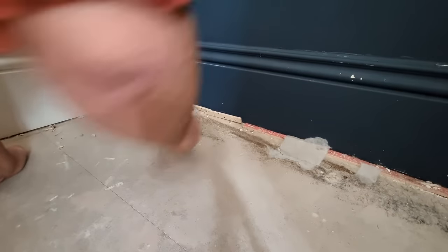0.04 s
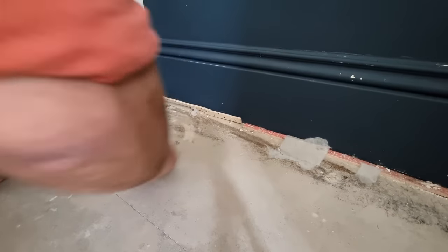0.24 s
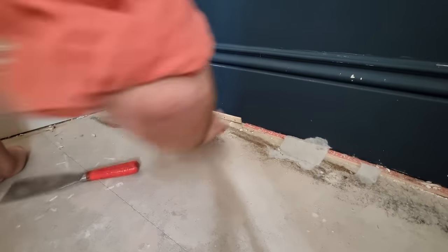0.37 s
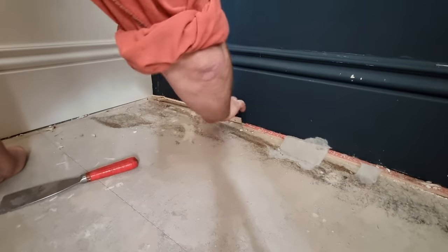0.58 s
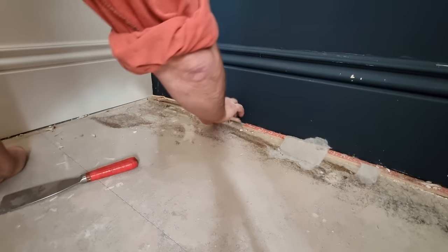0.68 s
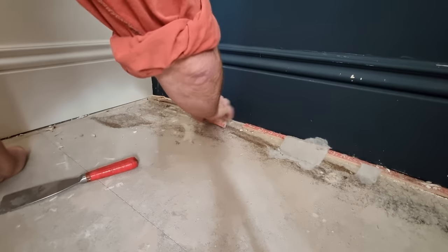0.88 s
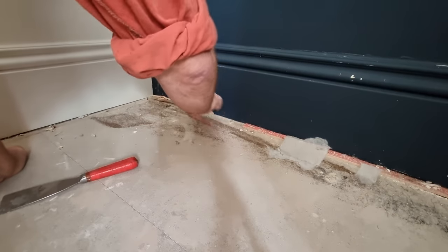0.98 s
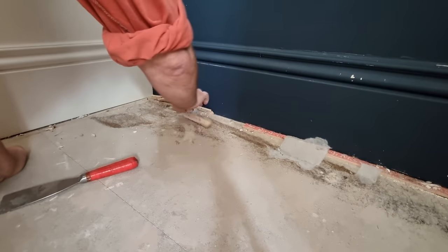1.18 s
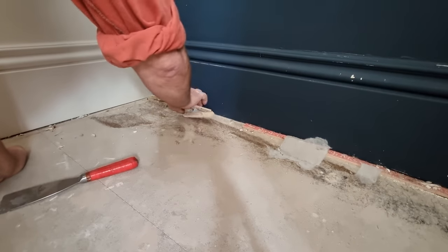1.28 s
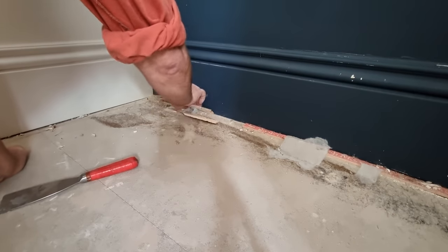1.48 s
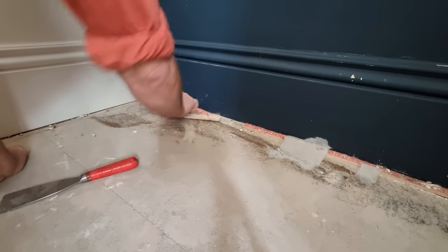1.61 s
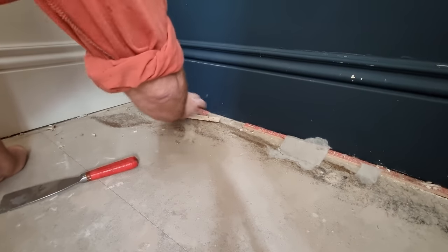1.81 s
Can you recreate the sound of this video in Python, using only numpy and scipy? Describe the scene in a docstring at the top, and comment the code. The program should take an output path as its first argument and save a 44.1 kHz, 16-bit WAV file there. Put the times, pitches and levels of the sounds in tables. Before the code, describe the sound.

Metal chisel dropped on a boarded floor, ringing and bouncing, followed by wood prising cracks

```python
"""A steel chisel lands on hollow floorboards, bounces and rings: clicks, clatter and dying modes of blade and handle.
Fingers then prise up a wooden strip, which cracks and snaps (modes and noise bursts) and scrapes (random grains).
The boards boom and knock as modes struck by a smooth push, and creak low under body weight (shaped noise).
A small bare room adds noise tails and a soft hush; a phone lies near,
its right port shaded and out of step with the left."""
import sys
import numpy as np
from scipy import signal
from scipy.fft import rfft, irfft, next_fast_len
from scipy.io import wavfile

SR = 44100
rng = np.random.default_rng(int(sys.argv[2]) if len(sys.argv) > 2 else 0)


def undo_db(level):
    """Turn decibels back into plain size, where 20 dB means ten times bigger."""
    steps = np.asarray(level, float) / 20
    return 10 ** steps


def to_wav(sig):
    """Store sig (one row per channel, or 1-D mono) as 16-bit WAV at the path in sys.argv[1].

    Samples outside -1..1 are clipped; the rate is SR.
    """
    pcm = np.clip(np.atleast_2d(sig), -1, 1) * 32767
    pcm = np.round(pcm).astype(np.int16)
    wavfile.write(sys.argv[1], SR, pcm.T)  # frames by channels


N = 81585  # samples in the scene


def unit(x):
    """Scales a sound to rms 1."""
    return x / np.sqrt(np.mean(x ** 2) + 1e-20)


def along(points, hz):
    """Reads (frequency, value) points on a log frequency axis."""
    f, value = np.transpose(points)
    return np.interp(np.log(hz + 1), np.log(f + 1), value)


def curve(rows):
    """Joins (time, value) points with straight lines, one value per sample."""
    return np.interp(np.arange(N) / SR, *np.transpose(rows))


def filtered(x, response):
    """Multiplies the spectrum of x by a complex response of frequency."""
    m = next_fast_len(x.shape[-1] + SR // 2)
    spectrum = rfft(x, m) * response(np.fft.rfftfreq(m, 1 / SR))
    return irfft(spectrum, m)[..., :x.shape[-1]]


def coloured(x, spectrum):
    """Shapes x by a spectrum in dB and scales it to rms 1."""
    return unit(filtered(x, lambda hz: undo_db(along(spectrum, hz))))


def add(track, s, sound):
    """Mixes a sound in at s seconds; one that began before the start enters part-way through."""
    i = round(s * SR)
    part = track[max(i, 0):max(i + len(sound), 0)]
    part += sound[max(-i, 0):][:len(part)]


FLUTTER_PER_S = 65  # new random levels per second in a wavering mode


def ring(modes, spread_db, length_s, tilt_db=0, flutter_db=0):
    """Struck body: dying sine modes, each with a new level at every blow and its own wavering."""
    t = np.arange(int(length_s * SR)) / SR
    hz, db, t60 = np.transpose(modes)[:, :, None]
    knots = rng.standard_normal((len(modes), 64))
    waver = np.array([np.interp(t * FLUTTER_PER_S, np.arange(64), k) for k in knots])
    level = db + tilt_db * np.log2(hz / hz[0])  # tilt per octave above the first mode
    level = level + spread_db * rng.standard_normal(hz.shape) + flutter_db * waver
    return np.sum(undo_db(level - 60 * t / t60) * np.sin(2 * np.pi * hz * t), axis=0)


RISE_S = 0.0011  # time constant of a burst's onset


def burst(hz, width, t60):
    """Dying noise through a broad resonance, applied twice for steep skirts; peak 1."""
    t = np.arange(SR // 8) / SR
    noise = rng.standard_normal(len(t)) * undo_db(-60 * t / t60) * (1 - np.exp(-t / RISE_S))

    def resonance(f):
        damping = 1j * f * width * hz  # width is a fraction of the pitch
        return (damping / (hz * hz - f * f + damping)) ** 2

    out = filtered(noise, resonance)
    return out / np.abs(out).max()


# chisel contacts; hardness tilts the blade's modes and moves the click's pitch:
# (time [s], click level [dB], blade ring level [dB], handle knock level [dB], hardness [dB per octave])
CONTACTS = [(-.1, -90, -45.5, -35.5, 11), (.2040, -16.5, -29, -35.5, -1), (.2384, -15, -34, -32, 0),
            (.2500, -25, -30, -55, -0.5), (.2790, -6, -34, -27.5, -3.5), (.2970, -40, -30.5, -28.5, -10),
            (.3346, -26, -42, -28, 9), (.3568, -22.5, -35.5, -35, -3.5), (.3972, -25, -70, -34, 3),
            (.4175, -19.5, -26, -31, 2), (.4368, -23, -53, -36.5, 5), (.5520, -32.5, -76, -50.5, -8)]
# ringing modes of the steel blade: (frequency [Hz], level [dB], t60 [s])
BLADE_MODES = [(3270, -14, .35), (3323, -7, .3), (3390, -16, .12), (4850, -20, .2), (4884, -9, .42),
               (5943, -28, .2), (6714, -12, .4), (6770, -22, .2), (8850, -17, .27), (9300, -24, .15),
               (10870, -23, .14), (11310, -18, .2), (13440, -18, .16), (14250, -21, .12)]
# duller modes of the handle: (frequency [Hz], level [dB], t60 [s])
HANDLE_MODES = [(496, -7.5, 0.087), (555, -7.5, 0.15), (658, -5, 0.072), (695, -11, 0.26),
                (707.5, 0.5, .14), (780, -16.5, .1)]
MUTE_DB = -10  # change of blade ring at each later contact but the last
FLUTTER_DB = 4.5  # the ring wavers as the blade rocks
CLICK_HZ, HARD_DB_PER_OCTAVE = 2040, 3.5  # click pitch at zero hardness; hardness that lifts it an octave
CLATTER_DB = 5  # over the handle knock level


def chisel():
    """Every contact clicks, clatters, knocks the handle and rings the blade; later contacts mute that ring."""
    out = np.zeros(N)
    for k, (s, click_db, ring_db, knock_db, hard_db) in enumerate(CONTACTS):
        steel = ring(BLADE_MODES, spread_db=4.0, length_s=.45, tilt_db=hard_db, flutter_db=FLUTTER_DB)
        now = np.arange(len(steel)) / SR + s
        # count of muting contacts so far, each taking hold over 2 ms
        mutes = sum(np.clip((now - row[0]) / .002, 0, 1) for row in CONTACTS[k + 1:-1])
        add(out, s, undo_db(ring_db + MUTE_DB * mutes) * steel)
        handle = ring(HANDLE_MODES, spread_db=5, length_s=.3, flutter_db=FLUTTER_DB)
        add(out, s, undo_db(knock_db) * handle)
        add(out, s, undo_db(knock_db + CLATTER_DB) * burst(1000, width=1.24, t60=0.047))
        click_hz = CLICK_HZ * 2 ** (hard_db / HARD_DB_PER_OCTAVE)
        add(out, s, undo_db(click_db) * burst(click_hz, width=1.24, t60=0.022))
    return out


# cracks of the strip: (time [s], level [dB], pitch [Hz], treble snap level [dB], noise t60 [s])
CRACK_EVENTS = [(0.714, -44, 2920, -60, 0.15), (0.732, -36.5, 3570, -61, 0.1),
                (.7460, -33.5, 1442, -68, 0.027), (0.7993, -55.5, 2560, -38, 0.037),
                (0.816, -49.5, 1800, -49.5, 0.12), (0.9921, -36.5, 1000, -92, 0.026),
                (1, -33.5, 1110, -74.5, 0.028), (1.102, -29, 785, -46, 0.026),
                (1.1872, -30.5, 1160, -55.5, 0.015), (1.209, -44.5, 1500, -80, 0.009),
                (1.334, -21.5, 1880, -54, 0.015), (1.3682, -29, 2000, -54, 0.014),
                (1.472, -49, 3500, -67, 0.015), (1.4891, -38, 1500, -42.5, .04),
                (1.4979, -30, 3700, -26.5, 0.035), (1.5507, -36, 2870, -38.5, 0.027),
                (1.5610, -29, 1020, -69, 0.047), (1.576, -34, 1730, -44.5, 0.039),
                (1.6241, -32, 1020, -48, 0.038), (1.7192, -23, 1880, -78, 0.019),
                (1.746, -33.5, 1700, -73, 0.0135), (1.8280, -69, 720, -56, 0.021)]
# modes of the wooden strip: (frequency [Hz], level [dB], t60 [s])
STRIP_MODES = [(363, -2, 0.17), (762, 0, 0.054), (1170, -2.5, 0.049), (1386, -4, 0.032),
               (1800, -5.5, 0.022), (2335, 2, 0.016), (2960, -9.5, 0.015), (3700, -18, 0.0087),
               (5260, -22, 0.0083)]
# colour of the treble snap: (frequency [Hz], density [dB per Hz])
SNAP_COLOUR = [(2500, -31), (3700, 3.5), (5000, 3), (7000, 1.5), (9000, -0.5), (12000, 2), (16300, 2.5)]
# loudness of the rubbing: (time [s], level [dB])
SCRAPE_LEVEL = [(0, -69.5), (.55, -82), (.66, -52), (.70, -68), (.72, -55), (.76, -48), (.8, -70),
                (.85, -81), (.89, -80.5), (1.2, -52), (1.3, -67), (1.33, -44.5), (1.46, -73), (1.5, -42.5),
                (1.58, -58), (1.61, -80), (1.68, -67.5), (1.85, -67)]
# colour of the rubbing: (frequency [Hz], density [dB per Hz])
GRIT_COLOUR = [(250, -9), (400, 10), (900, 2.5), (1500, -6.5), (2200, -11.5), (3200, -5.5), (4500, -14),
               (7500, -24), (9000, -28.5), (16000, -19.5)]
STRIP_DB, OFF_PITCH_DB = -7.5, -5.5  # mode ring within a crack; change per octave away from the crack's pitch
SPLINTER_DB = -12  # broad ring of the thin wood, relative to the crack
GRAINS_PER_S, GRAIN_SPREAD_DB = 3100, 1.5


def strip():
    """Cracks ring the modes near their pitch, with woody noise and a short treble snap, over gritty rubbing."""
    out, t = np.zeros(N), np.arange(SR // 16) / SR
    for s, db, hz, snap_db, t60 in CRACK_EVENTS:
        near = [(f, level + OFF_PITCH_DB * abs(np.log2(f / hz)), life) for f, level, life in STRIP_MODES]
        add(out, s, undo_db(db + STRIP_DB) * ring(near, spread_db=5.5, length_s=.12))
        crack = burst(hz, width=0.67, t60=t60)
        splinter = burst(1500, width=1.05, t60=t60)
        add(out, s, undo_db(db) * (crack + undo_db(SPLINTER_DB) * splinter))
        snap = coloured(rng.standard_normal(len(t)), SNAP_COLOUR)
        add(out, s, undo_db(snap_db - 60 * t / 0.047) * snap)  # t60 0.047 s
    chance = rng.random((N, 2))
    caught = chance[:, 0] < GRAINS_PER_S / SR
    size = undo_db(-GRAIN_SPREAD_DB * np.log(chance[:, 1] + 1e-4))  # a few grains stand out
    grains = caught * size * rng.standard_normal(N)
    return out + undo_db(curve(SCRAPE_LEVEL)) * coloured(grains, GRIT_COLOUR)


# loads on the boards, before push and bass cut shape them: (time [s], boom level [dB], knock level [dB])
LOADS = [(0.207, -22, -27), (0.283, -12, -20), (.359, -12.5, -20.5), (0.399, -20.5, -41),
         (.44, -17.5, -32.5), (0.499, -42, -39), (0.554, -65, -37.5), (0.577, -40, -36.5),
         (.622, -54, -36.5), (.645, -50, -39.5), (.67, -73, -48.5), (0.718, -36.5, -54),
         (0.767, -39.5, -49), (0.798, -54.5, -48), (0.942, -51, -74), (1.001, -46, -41),
         (1.104, -54.5, -33), (1.188, -56, -42), (1.234, -41, -43.5), (1.334, -47.5, -47),
         (1.49, -29, -36.5), (1.502, -25, -42), (1.558, -26, -34), (1.618, -33.5, -64), (1.722, -68, -66.5),
         (1.83, -39.5, -52)]
# boom of the hollow floor: (frequency [Hz], level [dB], t60 [s])
BOOM_MODES = [(67, -9, .15), (82.1, -4.5, 0.25), (90.4, -9, 0.13), (112.2, -11.5, 0.15), (145.5, -9, 0.058)]
# knock of the nearest plank: (frequency [Hz], level [dB], t60 [s])
PLANK_MODES = [(168, -12.5, 0.21), (225.8, -13, 0.19), (268.9, 2.5, 0.094), (337.8, -5.5, 0.17),
               (361, -7.5, 0.077)]
CONTACT_S = 0.0029  # length of the push
BASS_CUT_HZ = 67  # the microphone's bass cut, applied here to booms and knocks: little is heard below this


def boards():
    """A smooth push booms in the hollow floor and knocks the nearest plank, heard through a bass cut."""
    out, push = np.zeros(N), np.hanning(int(CONTACT_S * SR))
    for s, boom_db, knock_db in LOADS:
        boom = ring(BOOM_MODES, spread_db=4, length_s=.35)
        knock = ring(PLANK_MODES, spread_db=1.0, length_s=.35)
        add(out, s, undo_db(boom_db) * boom + undo_db(knock_db) * knock)
    out = signal.fftconvolve(out, push / push.sum())[:N]
    return filtered(out, lambda f: ((1j * f) ** 2 / (BASS_CUT_HZ ** 2 - f * f + 1.4j * f * BASS_CUT_HZ)) ** 2)


# swell of the creak: (time [s], level [dB])
WEIGHT_LEVEL = [(0.0, -64), (0.148, -73), (0.39, -47), (0.51, -77), (0.674, -73), (0.896, -64.5),
                (1.06, -69), (1.236, -51.5), (1.37, -53.5), (1.452, -49.5), (1.642, -60), (1.85, -63)]
# colour of the creak: (frequency [Hz], density [dB per Hz])
CREAK_COLOUR = [(20, -48), (30, -17), (40, 16), (55, 1), (130, 1), (300, -43.5)]


def body_weight():
    """Slow creak of body weight on the joists: low noise that swells and fades."""
    return undo_db(curve(WEIGHT_LEVEL)) * coloured(rng.standard_normal(N), CREAK_COLOUR)


# decay of the small bare room: (frequency [Hz], t60 [s])
ROOM_DECAY = [(100, 0.38), (500, 0.42), (2000, 0.26), (6000, 0.28), (14000, .15)]


def room(x):
    """Two noise tails, each frequency dying at its own speed; fresh tails for each fifth of a second."""
    out, step = np.zeros((2, N + SR)), SR // 5
    for i in range(0, N, step):
        hz, t, z = signal.stft(rng.standard_normal((2, SR // 2)), SR, nperseg=256)
        decay = undo_db(-60 * t / along(ROOM_DECAY, hz)[:, None])
        tail = signal.istft(z * decay, SR, nperseg=256)[1]
        wet = signal.fftconvolve(x[None, i:i + step], tail / np.linalg.norm(tail[0]), axes=1)
        out[:, i + SR // 200:][:, :wet.shape[1]] += wet  # 5 ms after the direct sound
    return out[:, :N]


# colour of the room and microphone hush: (frequency [Hz], density [dB per Hz])
HUSH_COLOUR = [(30, -23), (70, 12), (200, 13.5), (500, -14.5), (1000, -7.5), (3000, -8), (7000, -10.5),
               (9000, -12.5), (16300, -45.5)]


def hush():
    """Steady room and microphone hush, two independent shaped noises: one heard at both ports, one at the right."""
    return coloured(rng.standard_normal((2, N)), HUSH_COLOUR)


# extra room sound and hush that only the right port hears: (frequency [Hz], level [dB])
STRAY_LEVEL = [(60, -14), (150, -6), (500, 2), (1300, -1), (3000, 3), (8000, 4)]
ROOM_DB, HUSH_DB = -9, -66  # levels in the mix before the port gains
CORNER_DB = -4  # the right port faces away from the corner where the strip lies; its room and hush drop too
PAIR_DB = 5.5  # gain of both ports


def scene():
    """What arrives at the left and at the right port, before the phone's body shades the right one."""
    tool = chisel() + (boards() + body_weight())
    corner = strip()
    around = undo_db(ROOM_DB) * room(tool + corner) + undo_db(HUSH_DB) * hush()
    stray = filtered(around[1], lambda hz: undo_db(along(STRAY_LEVEL, hz)))
    left = tool + corner + around[0]
    right = tool + undo_db(CORNER_DB) * (corner + around[0] + stray)
    return undo_db(PAIR_DB) * np.array([left, right])


def band_limit(x):
    """A steep low-pass at the top of the band."""
    return signal.sosfilt(signal.butter(12, 16490, fs=SR, output="sos"), x)


# loss at the shaded right port: (frequency [Hz], loss [dB])
SHADE_LOSS = [(60, 14.5), (110, 14.5), (200, 14), (380, 7), (700, 5), (1290, 8), (2380, 11.5), (4400, 15.5),
              (8120, 18), (15000, 21)]
# phase by which the left port leads the right; below zero it trails: (frequency [Hz], phase [radians])
LEFT_LEAD = [(60, 0), (150, -.4), (260, -2.3), (860, -2.6), (2500, -2), (7700, -1.8), (16000, -1.5)]
# response of both microphones: (frequency [Hz], level [dB])
MIC_RESPONSE = [(3200, -1), (4000, -6), (5000, -2), (6200, -3), (7400, 0.5), (8200, -9), (10000, -10),
                (16000, -12)]
TOP_HZ = 16450  # nothing passes from here up
CEILING, KNEE = .58, 5  # full-scale limit of the rounded peaks; higher knee = sharper bend


def record(dry):
    """The right port is shaded and shifted in phase; the treble dulls above a small peak; peaks are rounded off."""
    left, right = dry
    right = filtered(right, lambda hz: undo_db(-along(SHADE_LOSS, hz)) * np.exp(-1j * along(LEFT_LEAD, hz)))
    pair = np.array([left, right])
    pair = filtered(pair, lambda hz: undo_db(along(MIC_RESPONSE, hz)) * (hz < TOP_HZ))
    mix = pair / (1 + np.abs(pair / CEILING) ** KNEE) ** (1 / KNEE)
    return band_limit(mix)


dry = scene()
out = record(dry)
to_wav(out)
```